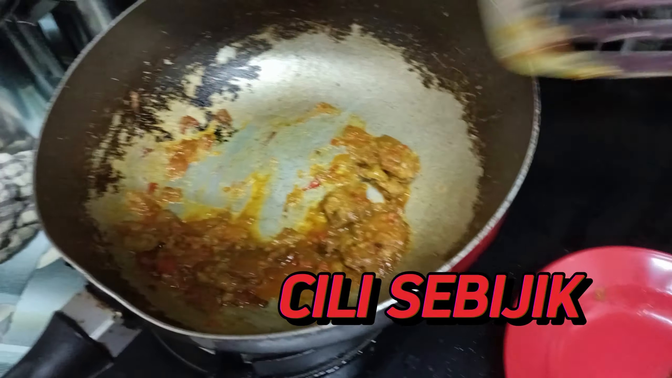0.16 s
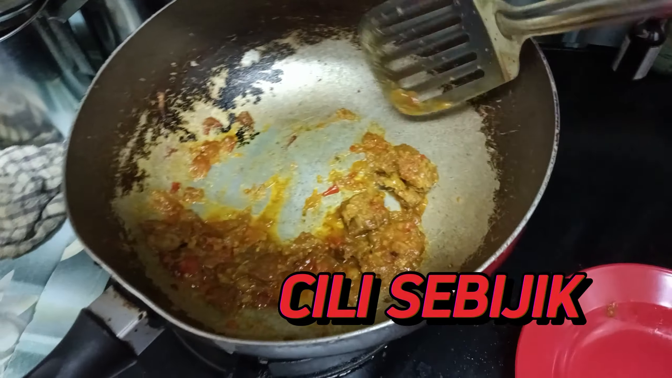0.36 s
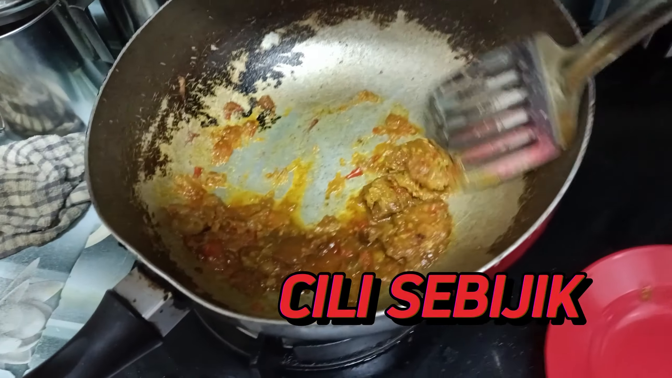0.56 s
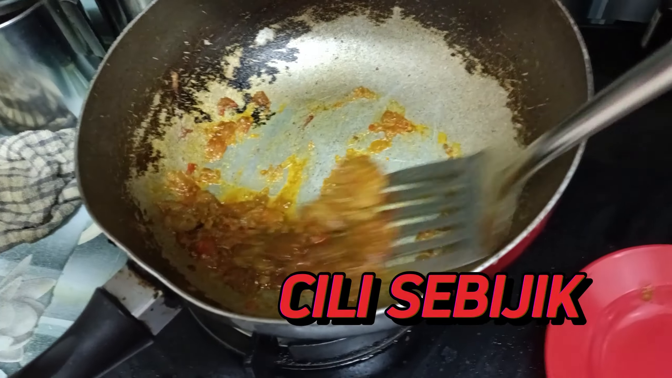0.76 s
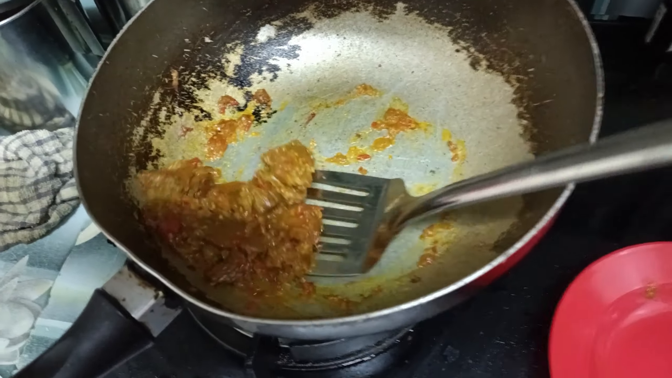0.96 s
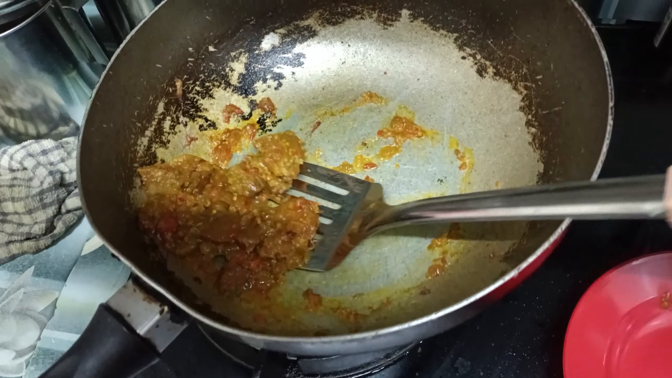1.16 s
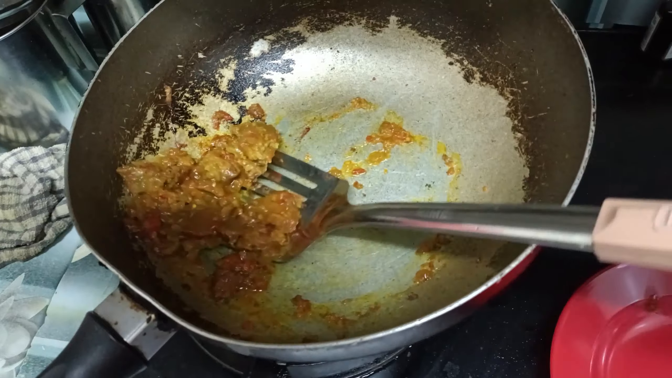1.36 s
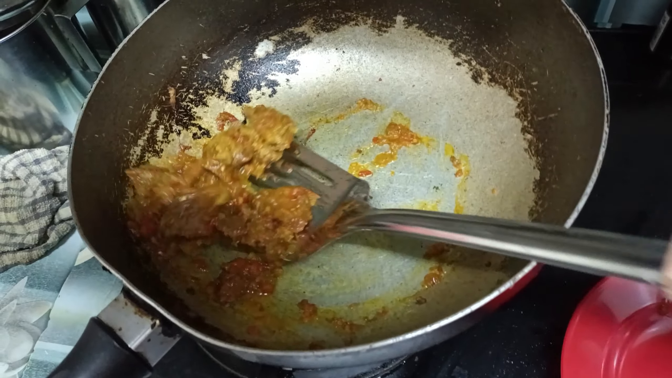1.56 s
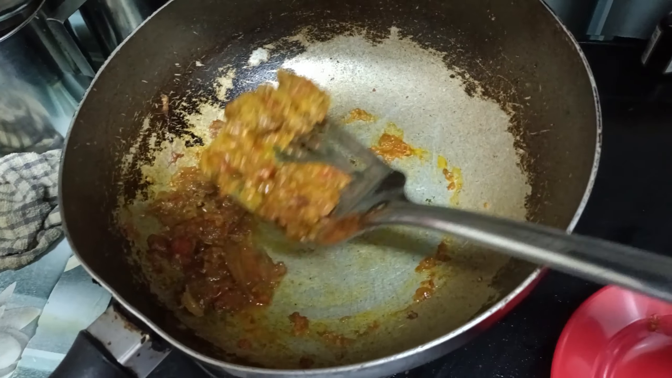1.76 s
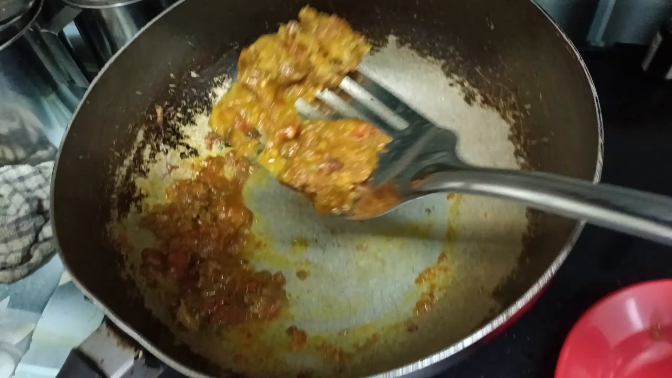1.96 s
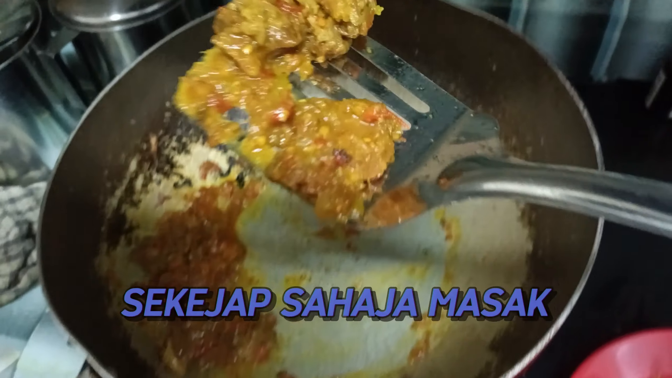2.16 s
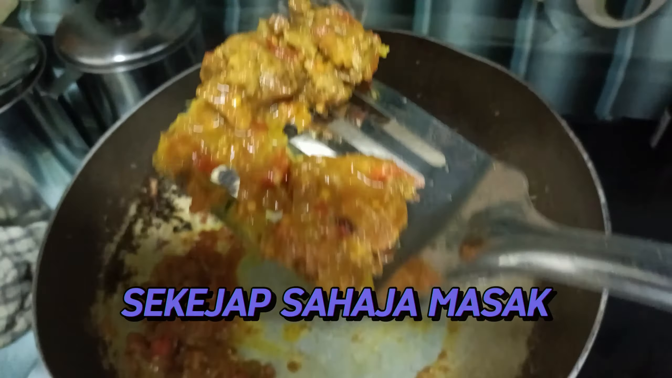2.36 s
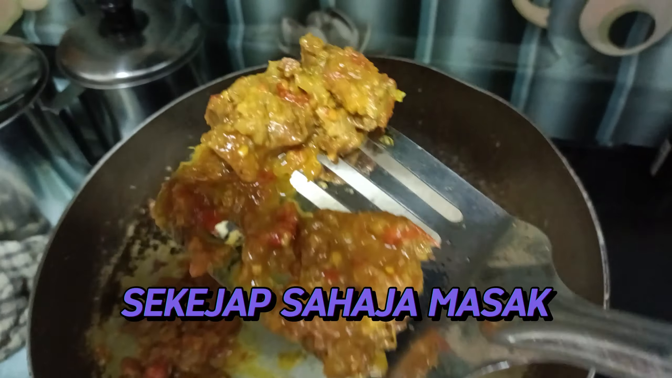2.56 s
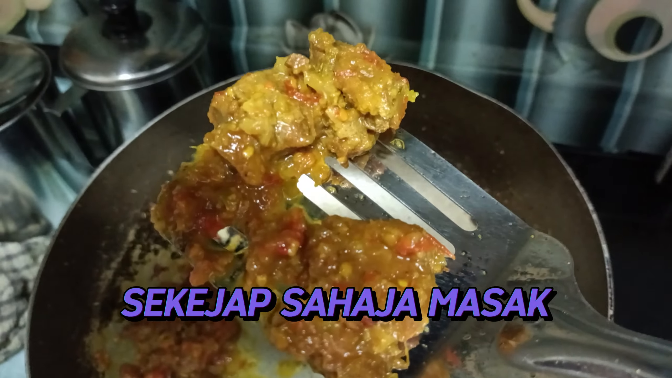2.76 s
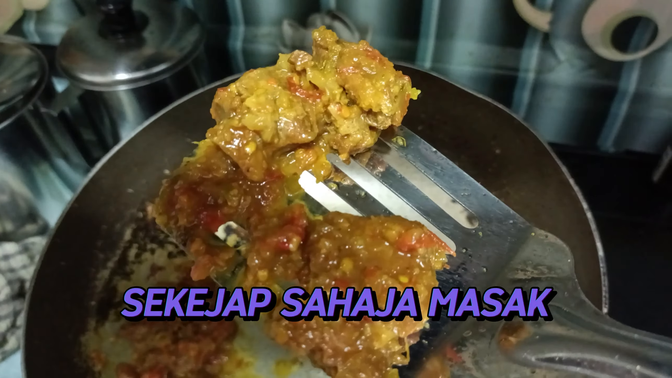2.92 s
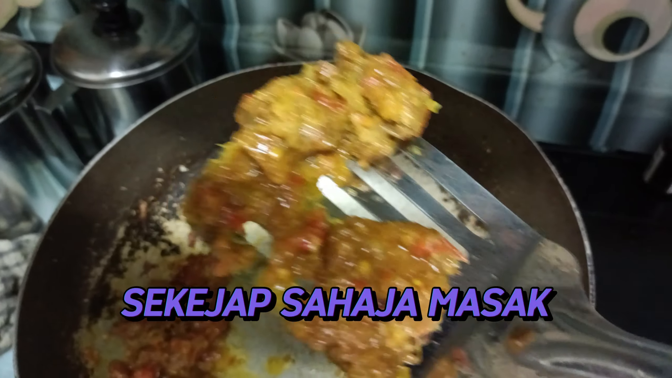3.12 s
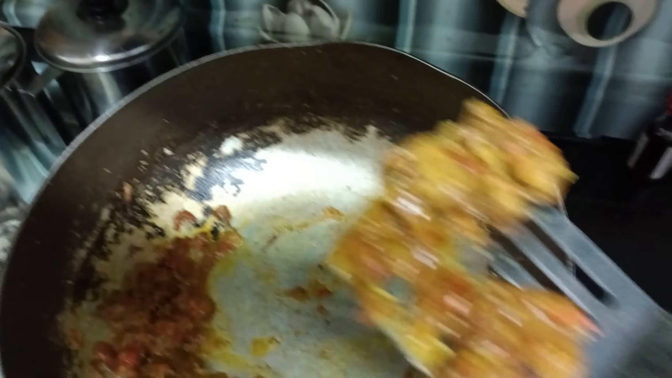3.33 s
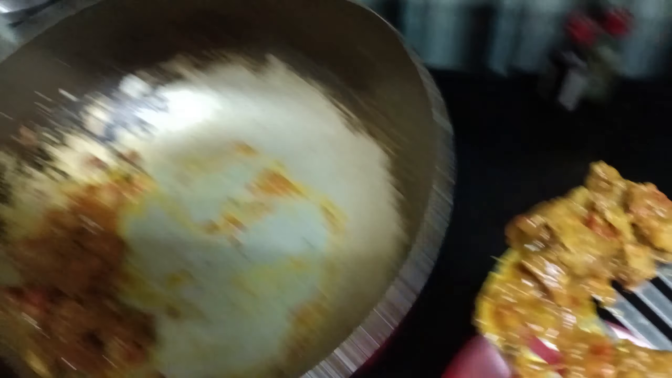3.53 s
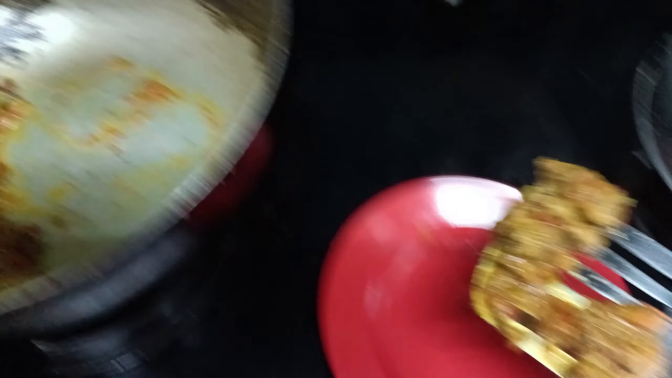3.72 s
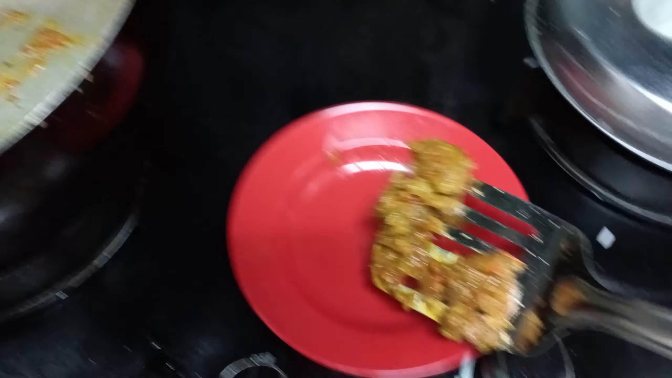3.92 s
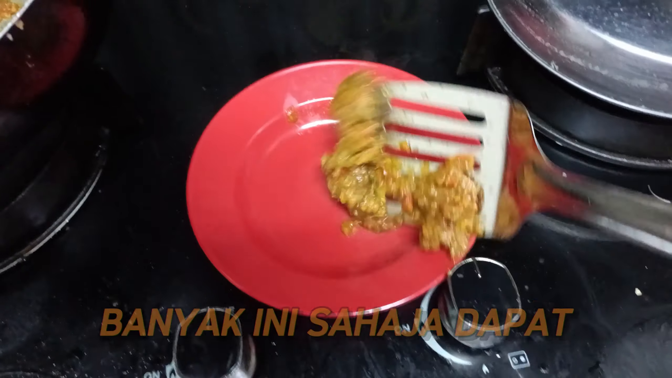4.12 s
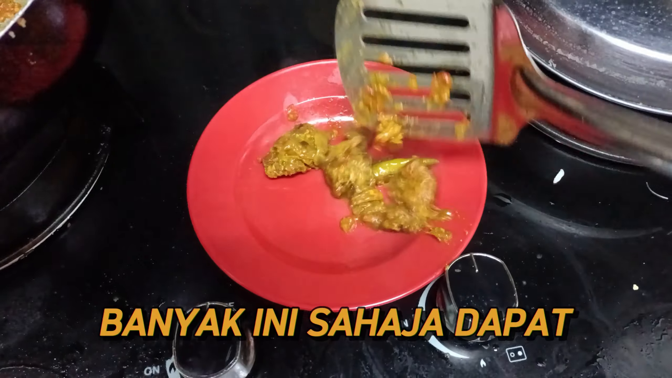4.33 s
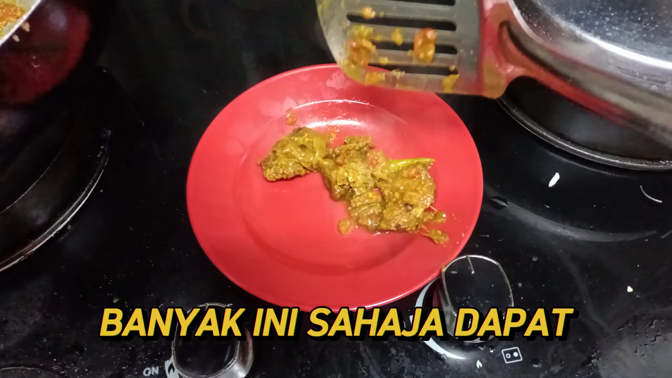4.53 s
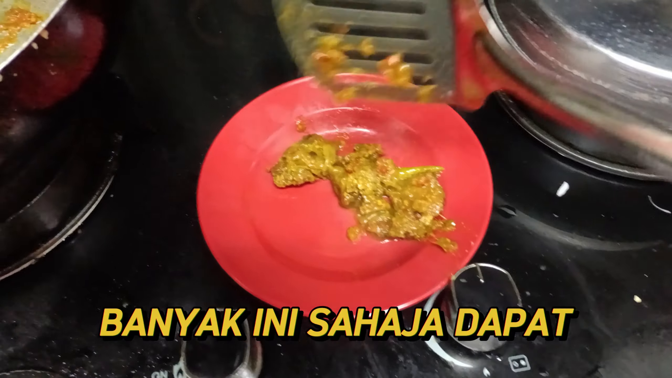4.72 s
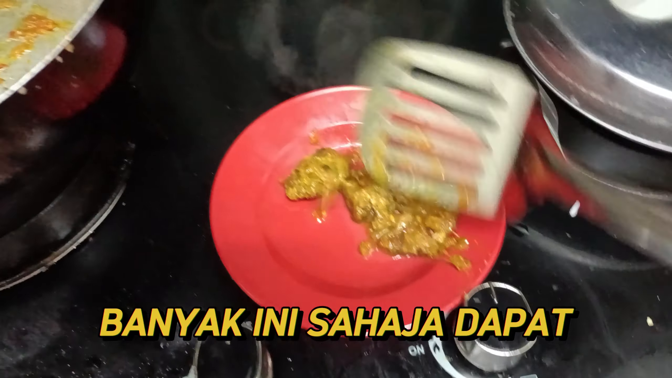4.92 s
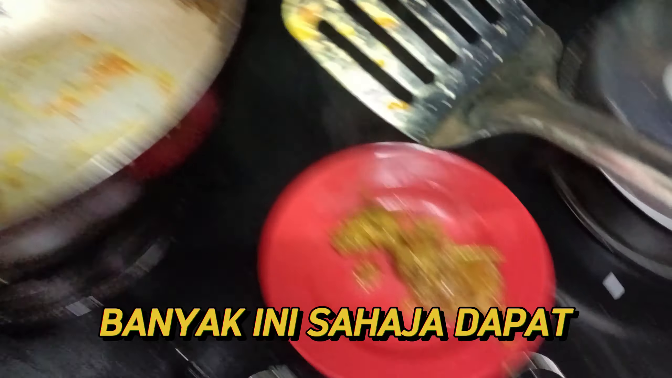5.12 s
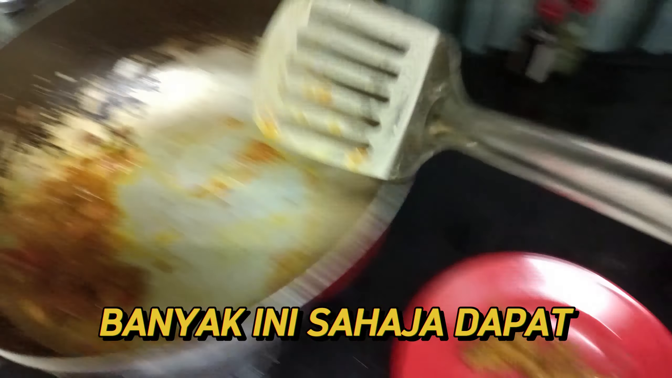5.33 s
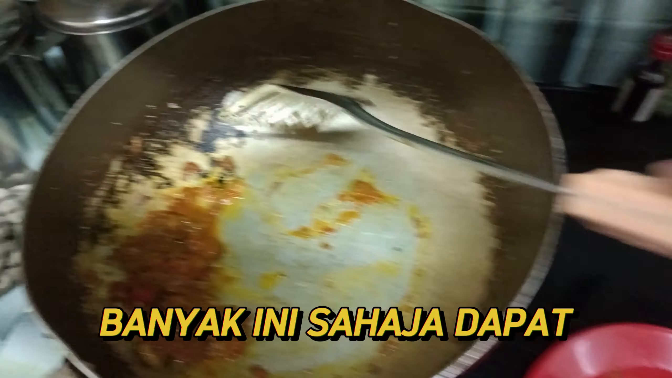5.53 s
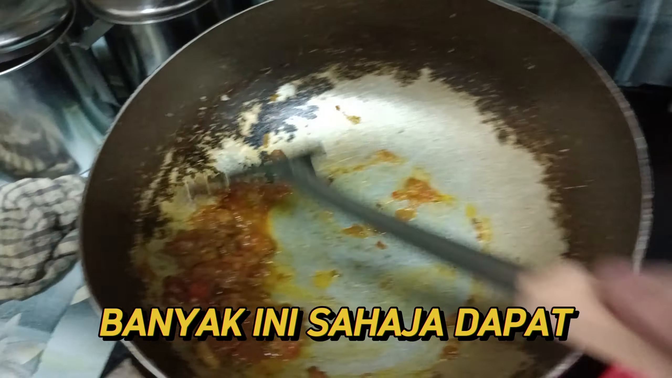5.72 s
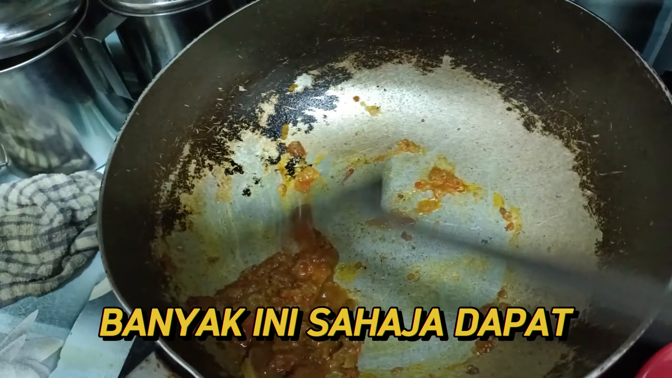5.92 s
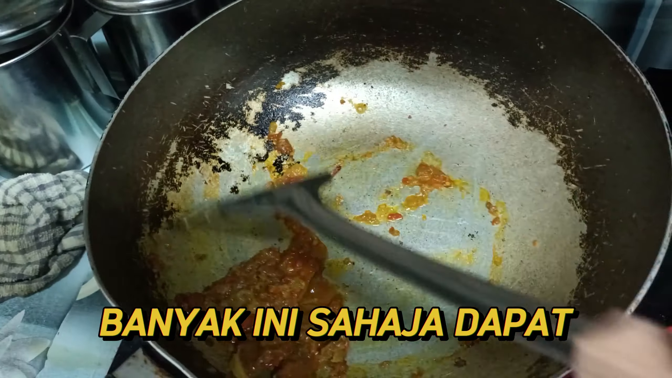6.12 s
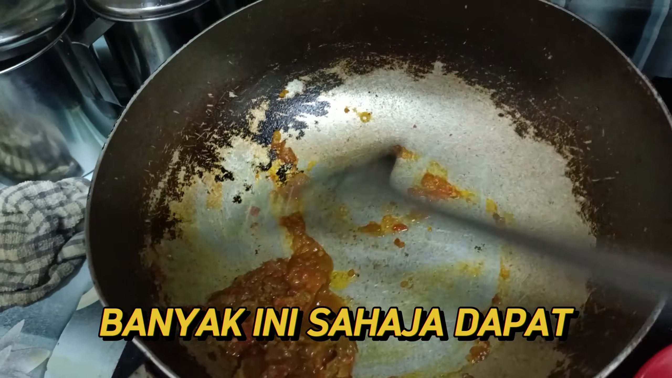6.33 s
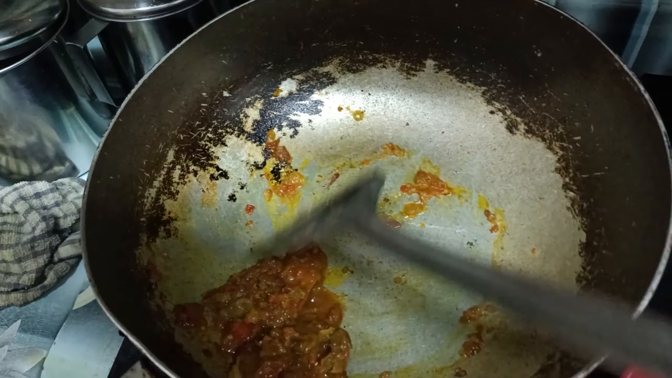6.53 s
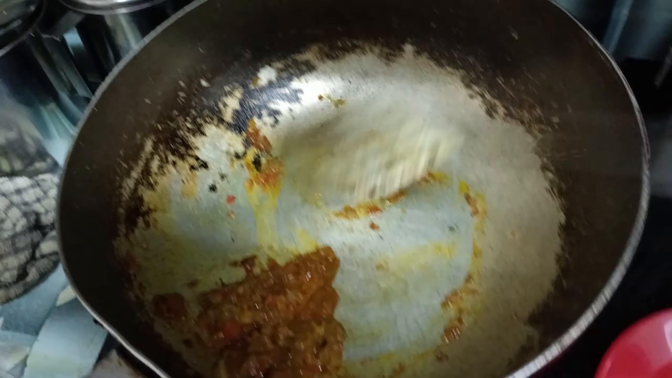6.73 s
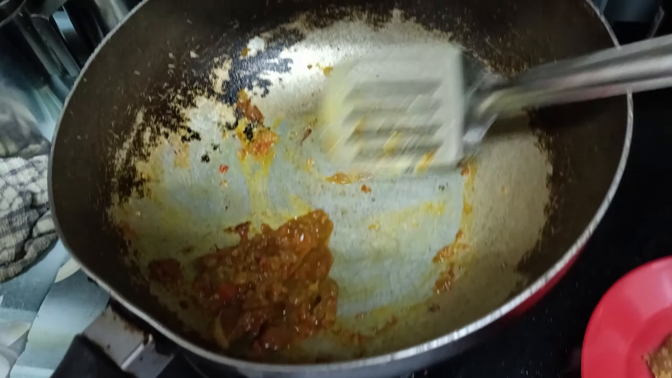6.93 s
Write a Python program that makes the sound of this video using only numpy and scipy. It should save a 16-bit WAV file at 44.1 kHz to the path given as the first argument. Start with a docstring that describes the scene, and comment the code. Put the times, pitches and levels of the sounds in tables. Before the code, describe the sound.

Close up in a small kitchen, oil fizzes softly over the low rumble and thin whine of a fan. At about 0.4 seconds a steel spatula knocks sharply in a wok, then scrapes over burnt crust, fading by 1.3 seconds. A few lighter, drier taps come between 1.4 and 2.1 seconds, while the sizzle swells slightly and dies down. In the lull a faint thin whistle rises and falls around 3 seconds, with one tiny tick. From 4 to 5 seconds comes a quick, uneven run of metal taps and small scrapes. A hard ringing knock at 5.6 seconds starts more scraping, and the sizzle surges near 6 seconds before sinking again. The loudest clank lands at about 6.2 seconds, followed by rasping strokes, another knock at 6.6 and three quick knocks around 7 seconds.

```python
"""A small kitchen, close on a wok: a slotted steel spatula knocks and scrapes through frying food.
Knocks crack, rattle and ring bowl and blade; scrapes stutter over burnt crust and set the steel humming.
Steam bubbles fizz in the oil, swelling after the stirs and dying down, and a thin whistle comes and goes.
A fan rumbles and whines behind it. A phone's two microphone ports each add their own peaks and notches."""
import sys
import numpy as np
from scipy import signal
from scipy.fft import rfft, irfft
from scipy.io import wavfile
from scipy.ndimage import uniform_filter1d

SR = 44100
rng = np.random.default_rng(int(sys.argv[2]) if len(sys.argv) > 2 else 0)


def transcribe(signal):
    """Save signal, clipped to [-1, 1], as a 16-bit WAV file at the path in sys.argv[1]."""
    frames = np.atleast_2d(signal).T
    limited = np.clip(frames, -1, 1)
    pcm = np.round(limited * 32767).astype(np.int16)
    wavfile.write(sys.argv[1], SR, pcm)


N = 312228

# Modes of the wok's bowl and the spatula's blade: (frequency [Hz], level [dB], undamped t60 [s])
STEEL_MODES = [(112, 20.5, 0.22), (334, 0.5, 0.37), (522, 2.5, 0.23), (575, 1, 0.21), (688, 1.5, 0.34),
               (800, -18.5, 0.43), (1088, -19.5, 0.11), (1117, 1, 0.16), (1262, 0.5, 0.087),
               (1758, -14.5, 0.34), (2220, -5, 0.14), (2585, -31, 0.093), (3114, -3.5, 0.18),
               (3240, -12, 0.29), (3620, -9.5, 0.27), (4150, -0.5, 0.085), (4180, -28, 0.39),
               (4720, -9.5, 0.2), (5030, -12.5, 0.16), (5130, -5.5, 0.17), (5320, -14, .14),
               (5430, -2, 0.09), (5420, -14.5, 0.15), (6050, -9, 0.066), (6640, -10.5, .12),
               (6800, -4, 0.071), (7490, -6.5, 0.25), (8500, -3, 0.16), (8920, -1, .08),
               (9990, -6.5, 0.064)]
# Broad rasp of steel on steel: (frequency [Hz], level [dB])
RASP_EQ = [(60, -20), (110, -3), (250, 4), (600, 11), (1300, -2), (1700, -4.5), (2450, 5), (3150, 0.5),
           (3750, 0.5), (4300, 4.5), (4900, 1.5), (6000, 0.5), (10000, -0.5), (16000, -7.5)]
THUMP_HZ, BOWL_TOP_HZ, TREBLE_HZ = 200, 1600, 7800  # crossovers: thump | bowl | middle | top
ALIKE_HZ = 900  # modes below this reach both ports alike


def knocks(crack_s=0.0011, rattle_db=-9, clack_db=-4, clack_s=0.011, bowl_ring_db=-20, favour_db=11):
    """The spatula strikes: a crack, a dying rattle and every mode ringing by a share set by the spot hit."""
    # (time [s], level [dB], bowl thud [dB re level], top treble [dB re level], blade ring [dB re level],
    #  favoured bowl ring [Hz], low blade ring [Hz], high blade ring [Hz], rise [s], rattle t60 [s])
    hits = [(0.371, -16.5, 6, -10, -5, 1110, 3620, 6240, 0.0021, 0.017),
            (0.4908, -8.5, -1, 5.5, -20, 630, 4150, 6050, 0.0043, 0.076),
            (0.5682, -19, -15, -27, -7, 563, 3210, 5200, 0.0039, 0.088),
            (1.44, -36.5, -9, 11, -15, 358, 4570, 6590, 0.0013, 0.07),
            (1.501, -19, 0, -5, -18, 533, 4200, 6100, 0.0012, 0.021),
            (1.6194, -37.5, 8, 8.5, -11, 523, 3200, 6010, 0.0023, 0.04),
            (1.7637, -26.5, -29, 1.5, -16, 517, 2970, 5460, 0.0012, 0.055),
            (2.1378, -33.5, -4.5, 6, -18, 353, 3180, 5430, 0.0013, 0.036),
            (3.0632, -46, -13, 6.5, -14, 638, 3040, 6170, 0.002, 0.07),
            (4.0171, -17, 3, -7, -26, 597, 4030, 6180, 0.0006, 0.044),
            (4.1098, -43, -22, -28, 2, 654, 3240, 6250, 0.003, 0.07),
            (4.1884, -18.5, -2.5, -1, -10.5, 1270, 4820, 6140, 0.0019, 0.045),
            (4.2914, -26, -47, 6, -10.5, 336, 2970, 6580, 0.00091, 0.055),
            (4.3608, -27.5, -22, -3, -24, 293, 4360, 6400, 0.002, 0.02),
            (4.419, -31.5, -39, -10, -15, 336, 3400, 5940, 0.00096, 0.08),
            (4.4503, -31.5, -35, -9, -22, 388, 3760, 5270, 0.0021, 0.042),
            (4.5043, -26, -30, 0, -20, 350, 3620, 6760, 0.0015, 0.035),
            (4.9353, -25, -22, -3, -23, 380, 4130, 6800, 0.00065, 0.038),
            (5.0438, -27.5, -5, -32, -16, 1140, 3710, 6090, 0.0016, 0.021),
            (5.6213, -9.5, 10, -4, -21, 622, 4320, 6050, 0.0011, 0.05),
            (6.0614, -19, -17.5, 2.5, -25, 1210, 3980, 5130, 0.0012, 0.024),
            (6.1828, -4.5, -4, 6, -25, 522, 3370, 5450, 0.0017, 0.054),
            (6.554, -14, -35, 0, -22.5, 560, 3190, 6900, 0.001, 0.07),
            (6.933, -16, 7, 0, -17, 700, 3350, 6000, 0.00055, 0.092),
            (6.975, -14.5, 1, -3, -17, 692, 3030, 6500, 0.0015, 0.034),
            (7.0589, -16.5, -1.5, -27, -16, 690, 3070, 5970, 0.0013, 0.09)]
    out, t = np.zeros((2, N + SR)), np.arange(SR // 6) / SR
    for start, level_db, thud_db, top_db, blade_db, *favoured, rise_s, rattle_t60 in hits:
        over_plate = 1.3 < start < 5.3  # these taps are drier and spare the stove its thump
        thump_db, damping = (-35, 0.3) if over_plate else (-11.5, 0.49)
        rise = 1 - np.exp(-t / rise_s)
        rasp = unit(colour(rng.standard_normal((2, len(t))), *np.transpose(RASP_EQ)))
        rattle = undb(rattle_db - 60 * t / rattle_t60)
        blow = rasp * rise * (np.exp(-t / crack_s) + rattle)
        gains = undb([thud_db + thump_db, thud_db, 0, top_db])
        sound = np.tensordot(gains, port_bands(blow), 1)
        for hz in favoured[1:]:  # the blade flexes briefly and colours the rattle
            sound += undb(clack_db) * driven_ring(blow, hz, clack_s)
        for hz, mode_db, t60 in STEEL_MODES:
            spot = rng.standard_normal()
            near_db = favour_db * nearness(hz, favoured, width=0.054)
            ring_db = bowl_ring_db if hz < BOWL_TOP_HZ else blade_db
            lag = int(abs(spot) * 20) if hz > ALIKE_HZ else 0  # samples between the ports
            click = np.array([t == 0, t == t[lag]], float)
            ringing = rise * ring(click, hz, damping * t60)  # food, plate or hand shortens the ring
            sound += gains[band_of(hz)] * undb(ring_db + mode_db + 2 * spot + near_db) * ringing
        i = int(start * SR)
        out[:, i:i + len(t)] += undb(level_db) * sound
    return out[:, :N]


def scrapes(hum_db=-12, blade_db=-14, groan_db=-4, grit_db=-3, favour_db=9, high_ring_hz=6080):
    """The edge stutters over burnt crust, rasping and humming the modes nearest the moving contact."""
    # (bowl at start [dB re scrape], bowl at end [dB re scrape], top treble when firm [dB re scrape],
    #  favoured blade ring [Hz]), then the edge's path: (time [s], scrape [dB], favoured bowl ring [Hz])
    strokes = [ ((1.5, -5, -12, 4150), [(0.33, -55, 994), (0.372, -29.5, 1088), (0.42, -77, 1000)]),
               ((-8, 3, -9.5, 3430), [(0.5, -20.5, 588), (0.54, -33, 507), (0.575, -31, 546),
               (0.666, -40, 538), (0.73, -39.5, 522)]), ((-11, 0.5, -8, 3150.5), [(0.73, -39.5, 522),
               (0.8, -33, 526), (0.822, -30, 548), (0.854, -33, 706), (0.894, -36.5, 685),
               (0.9, -40.5, 1120), (0.93, -33.5, 1184), (1.07, -47, 1078), (1.28, -60.5, 566)]),
               ((7, -2, -30, 3304), [(4.04, -45, 513), (4.066, -61, 517), (4.105, -54, 510),
               (4.16, -68, 594)]), ((3.5, -1, -18, 3797), [(4.2, -32.5, 943), (4.27, -81, 530)]),
               ((5, 3.5, -0.5, 5905), [(5.63, -51, 652), (5.646, -32.5, 641), (5.728, -41.5, 550)]),
               ((6, -4.5, 1.5, 3300), [(5.728, -45.5, 569), (5.772, -32.5, 604.6), (5.834, -29.5, 597),
               (5.866, -40.5, 560), (5.92, -51, 652)]), ((-3.5, -11.5, -7, 3100.5), [(6.19, -21, 598),
               (6.22, -28, 638.5), (6.264, -29.5, 701.5), (6.326, -44.5, 680), (6.38, -68, 690)]),
               ((0.5, -6.5, -6, 3300.5), [(6.51, -51.5, 596), (6.556, -23.5, 618), (6.624, -43.5, 850),
               (6.666, -34.5, 873), (6.692, -64, 885), (6.73, -57.5, 1055)]), ((1.5, 7.5, -7, 3651),
               [(6.89, -62, 660.6), (6.932, -24, 667.6), (6.988, -58.5, 696)]), ((9, -5, -9, 3099.5),
               [(6.988, -59, 686), (7.012, -42.5, 694), (7.066, -26.5, 714), (7.08, -29.5, 729)]), ]
    firm_db, fade_s = -31, 0.0066
    out = np.zeros((2, N + SR))
    for (bowl_start_db, bowl_end_db, firm_top_db, blade_hz), path in strokes:
        times, *columns = np.transpose(path)
        start, end = times[0], times[-1]
        t = np.arange(start, end + 1 / 8, 1 / SR)
        scrape_db, bowl_hz = (np.interp(t, times, column) for column in columns)
        favoured = bowl_hz, np.full_like(t, blade_hz), high_ring_hz
        bowl_db = np.interp(t, [start, end], [bowl_start_db, bowl_end_db])
        top_db = firm_top_db - 0.4 * (scrape_db - firm_db)  # a firmer scrape is duller
        fade = np.clip(np.minimum(t - start, end + fade_s - t) / fade_s, 0, 1)
        gains = undb(scrape_db) * fade * undb([bowl_db - 24, bowl_db, 0 * t, top_db])
        judder = undb(1.84 * wander(66.3, len(t)))
        stutter = judder * np.array([grains(9000, scatter_db=0.57, size=len(t)) for port in range(2)])
        rasp = port_bands(colour(stutter, *np.transpose(RASP_EQ)))
        sound = sum(gain * undb(db) * unit(band) for gain, db, band in zip(gains, (0, -9, 0, 0), rasp))
        # the wok's bowl groans low at its favoured ring under the scrape; the blade adds grit up high
        sound += gains[1] * undb(groan_db) * resonance(stutter[0], bowl_hz, width_hz=29.7)
        sound += gains[2] * undb(grit_db) * resonance(stutter, favoured[1], width_hz=510)
        for hz, mode_db, t60 in STEEL_MODES:
            near_db = favour_db * nearness(hz, favoured, width=0.037)
            spot_db = 3.5 * wander(7.7, len(t))
            shake = stutter[0] if hz < ALIKE_HZ else stutter
            held_db, damping = (hum_db, 0.52) if hz < BOWL_TOP_HZ else (blade_db, 0.56)
            drive = shake * gains[band_of(hz)] * undb(held_db + mode_db + near_db + spot_db)
            sound += driven_ring(drive, hz, damping * t60)  # the pressed blade shortens the ring
        i = int(start * SR)
        out[:, i:i + len(t)] += sound
    return out[:, :N]


def resonance(shake, hz, width_hz):
    """Scraped steel sounds at a favoured ring: the slow part of the shake rides a carrier at that pitch."""
    slow = signal.sosfilt(signal.butter(2, width_hz / 2, fs=SR, output="sos"), shake)
    return unit(slow * np.cos(2 * np.pi * np.cumsum(hz) / SR))


def nearness(hz, favoured, width):
    """How close a mode lies in log frequency to its range's favoured ring, 0-1; the bowl is less choosy."""
    bowl_hz, low_hz, high_hz = favoured
    if hz < BOWL_TOP_HZ:
        return np.exp(-(np.log(hz / bowl_hz) / width / 2) ** 2)
    if hz < 4950:
        return np.exp(-(np.log(hz / low_hz) / width) ** 2)
    return 0.41 * np.exp(-(np.log(hz / high_hz) / width) ** 2)


def fizz():
    """Countless tiny steam bubbles burst in the oil; each port hears its own crowd of them."""
    # Tone of the bursting bubbles: (frequency [Hz], level [dB])
    fizz_eq = [(300, -13.5), (900, -10.5), (1700, -4), (2500, 8), (4000, 6.5), (6300, 6.5), (9000, 3.5),
               (12000, 2.5), (16000, 3)]
    flicker = undb(0.58 * wander(17))
    crowds = [grains(12000, scatter_db=0.5) for port in range(2)]
    return flicker * np.array([unit(colour(pops, *np.transpose(fizz_eq))) for pops in crowds])


def whistle(t, peak_s=3.09, width_s=0.88):
    """A thin whistle rises out of the fizz in one slow swell."""
    swell = np.exp(-((t - peak_s) / width_s) ** 2)
    return undb(-25.5 + 17.5 * swell) * tone(3070, width_hz=50, waver_db=2.1)


def fan_rumble(shared=0.62):
    """Rumbling air from the fan, mostly shared by both ports."""
    # Tone of the moving air: (frequency [Hz], level [dB])
    air_eq = [(15, -49.5), (25, 4.5), (48, -4), (68, -4.5), (86, 4), (234, -8.5), (295, -1.5), (505, -4),
              (723, -8.5), (834, -13), (1050, -15), (1170, -14.5), (1800, -29), (2340, -62.5), (3960, -120)]
    mid, side = (unit(colour(rng.standard_normal(N), *np.transpose(air_eq))) for part in range(2))
    air = np.sqrt(shared) * mid + np.sqrt(1 - shared) * np.array([side, -side])
    return undb(2.5 * wander(6)) * air


def fan_whine():
    """Wavering hums and thin tones of the fan motor."""
    # Motor tones: (frequency [Hz], width [Hz], level [dB re fan])
    motor_tones = [(82.7, 5, -7), (105, 24, -13.5), (149, 9.3, -14), (194.5, 5.3, -15), (6220, 170, -17),
                   (6400, 13, -15.5)]
    return sum(undb(db) * tone(hz, width_hz, waver_db=4.85) for hz, width_hz, db in motor_tones)


def room(x, t60=0.15, wet_db=-4.5):
    """Near walls and pots scatter the sound differently to each port."""
    t = np.arange(SR // 3) / SR
    tail = rng.standard_normal((2, len(t))) * undb(-60 * t / t60)
    tail /= np.sqrt(np.sum(tail[0] ** 2))
    return x + undb(wet_db) * signal.fftconvolve(x, tail, axes=1)[:, :N]


def undb(db):
    return 10 ** (np.asarray(db) / 20)


def unit(x):
    return x / np.sqrt(np.mean(x ** 2))


def colour(x, hz, db):
    """Minimum-phase EQ through the given points."""
    grid = np.maximum(np.linspace(0, SR / 2, num=1025), 1)
    cepstrum = irfft(np.interp(np.log(grid), np.log(hz), db) * np.log(10) / 20)
    cepstrum[1:1024] *= 2
    cepstrum[1025:] = 0
    kernel = irfft(np.exp(rfft(cepstrum)))
    return signal.oaconvolve(x, np.array(kernel, ndmin=x.ndim), axes=-1)[..., :x.shape[-1]]


def port_bands(x):
    """Four bands x ports x time: the ports share thump and bowl, but face different metal higher up."""
    cuts = [([THUMP_HZ / 3, THUMP_HZ], "band"), ([THUMP_HZ, BOWL_TOP_HZ], "band"),
            ([BOWL_TOP_HZ, TREBLE_HZ], "band"), (TREBLE_HZ, "high")]
    bands = np.array([signal.sosfilt(signal.butter(3, *cut, fs=SR, output="sos"), x) for cut in cuts])
    bands[:2, 1] = bands[:2, 0]
    return bands


def band_of(hz):
    return int(hz > THUMP_HZ) + int(hz > BOWL_TOP_HZ) + int(hz > TREBLE_HZ)


def ring(x, hz, t60):
    """One mode; a unit click starts it at size 1."""
    radius, angle = 1000. ** (-1 / (t60 * SR)), 2 * np.pi * hz / SR
    return signal.lfilter([0, radius * np.sin(angle)], [1, -2 * radius * np.cos(angle), radius ** 2], x)


def driven_ring(x, hz, t60):
    """A mode shaken by noise, scaled so that a longer ring is no louder."""
    return ring(x, hz, t60) / np.sqrt(t60 * SR / 20)


def wander(rate, size=N):
    """Random levels held 1 / rate s and slewed twice; spread near 1."""
    hold = int(SR / rate)
    steps = np.repeat(rng.standard_normal(size // hold + 1), hold)
    return uniform_filter1d(uniform_filter1d(steps, hold), hold)[:size] * np.sqrt(2)


def grains(rate, scatter_db, size=N):
    """Dense random clicks whose sizes have a long tail."""
    clicks = (rng.random(size) < rate / SR) * rng.standard_normal(size)
    return unit(clicks * undb(scatter_db * rng.exponential(size=size)))


def tone(hz, width_hz, waver_db):
    """Noise in one narrow resonance, its level wavering."""
    t60 = np.log(1000) / np.pi / width_hz
    return undb(waver_db * wander(3.74)) * unit(ring(rng.standard_normal(N), hz, t60))


def scene():
    """Spatula and wok in the room, over a bed of frying and fan."""
    # Fader moves of the bed: (time [s], fizz [dB], fan [dB])
    faders = [(0.0, -47, -52), (0.32, -47.5, -50.5), (1.15, -45.5, -52), (1.55, -41.5, -53.5),
              (1.72, -47, -51), (1.88, -52, -54.5), (2.23, -53, -56), (3.5, -55.5, -52),
              (3.73, -59.5, -61.5), (3.98, -61.5, -57.5), (4.58, -64, -57.5), (5.4, -63, -57.5),
              (5.56, -57.5, -58), (5.93, -37, -58), (6.16, -41, -51.5), (6.38, -48.5, -60.5),
              (6.88, -52.5, -64)]
    t = np.arange(N) / SR
    times, *columns = np.transpose(faders)
    fizz_db, fan_db = (np.interp(t, times, column) for column in columns)
    whistling = whistle(t)
    low_cut = signal.butter(2, 87, "high", fs=SR, output="sos")  # a wok is too small to radiate deep bass
    steel = room(signal.sosfilt(low_cut, knocks() + scrapes()))
    return steel + undb(fizz_db) * (fizz() + whistling) + undb(fan_db) * (fan_rumble() + fan_whine())


def record(dry, top_hz=16400):
    """Each microphone port colours its channel; the phone cuts the top."""
    # Resonances and notches of the ports: (frequency [Hz], left [dB], right [dB])
    port_eq = [(100, -9, -9), (700, -4, -3.5), (1570, -0.5, 2.5), (2930, -7.5, 0.5), (4970, -4.5, 1.5),
               (6820, -14, 7.5), (6900, -20, 3.5), (7950, -1.5, -1.5), (8700, 8.5, -19), (9620, 7, -7.5),
               (11130, 7, -22), (12480, -2, 1), (14000, -4.5, 2.5), (16000, -47, 13.5), (15600, -51, 12),
               (15300, -58, -40)]
    hz, *gains_db = np.transpose(port_eq)
    ports = np.array([colour(x, hz, db) for x, db in zip(dry, gains_db)])
    return signal.sosfilt(signal.ellip(10, .2, 60, top_hz, fs=SR, output="sos"), ports)


dry = scene()
out = record(dry)
transcribe(out)
```